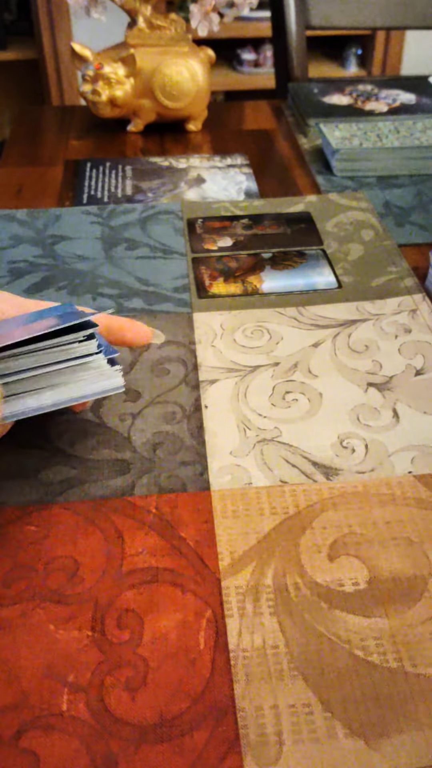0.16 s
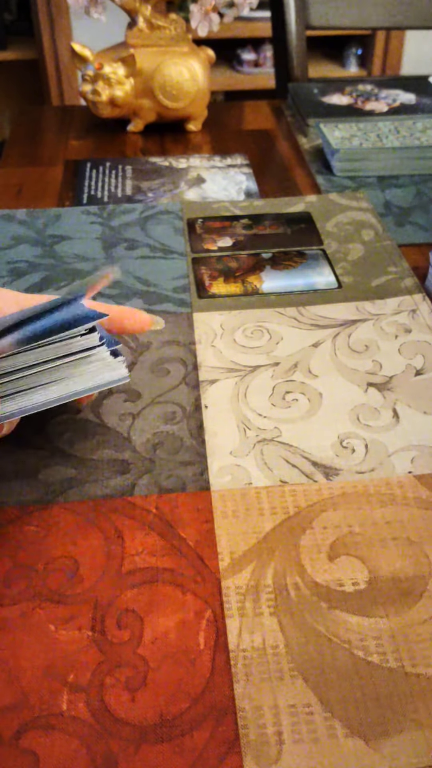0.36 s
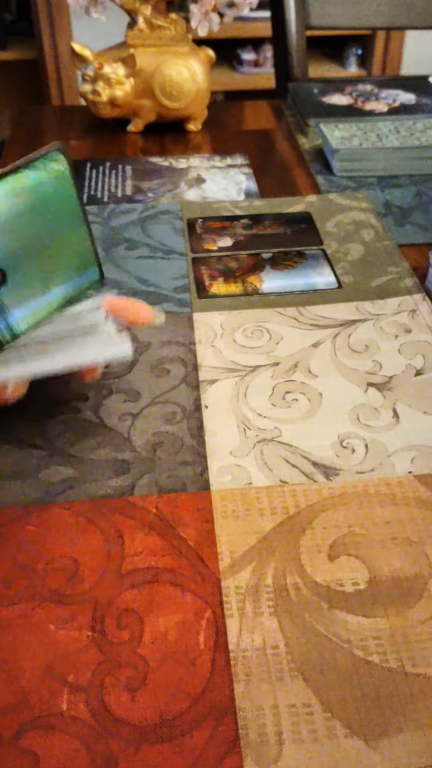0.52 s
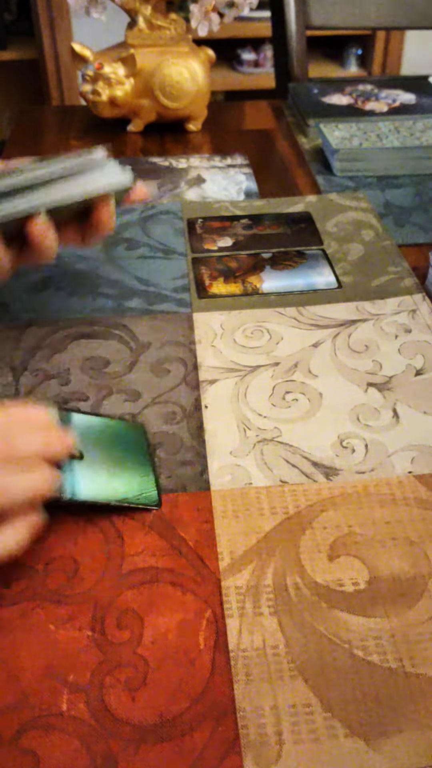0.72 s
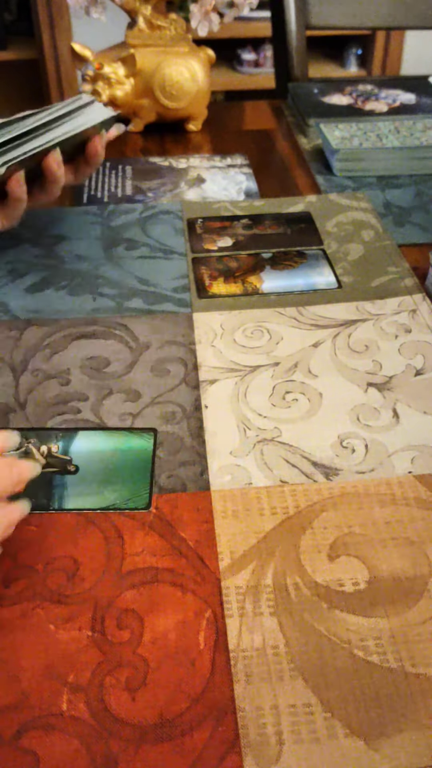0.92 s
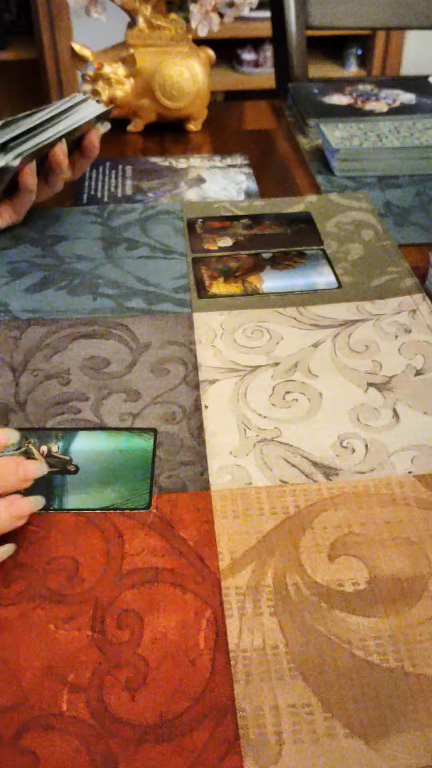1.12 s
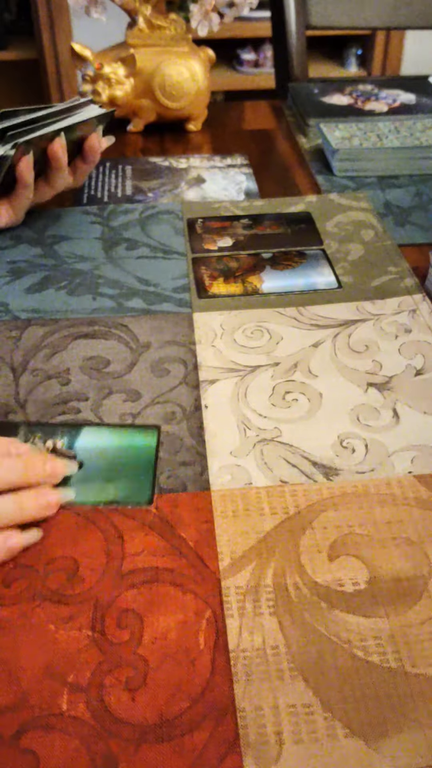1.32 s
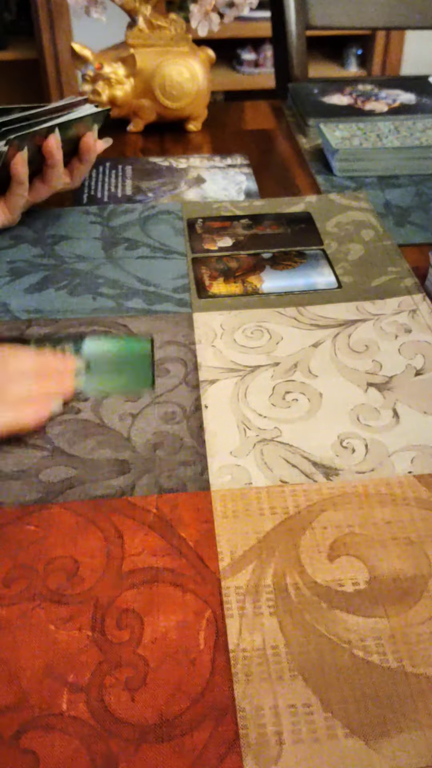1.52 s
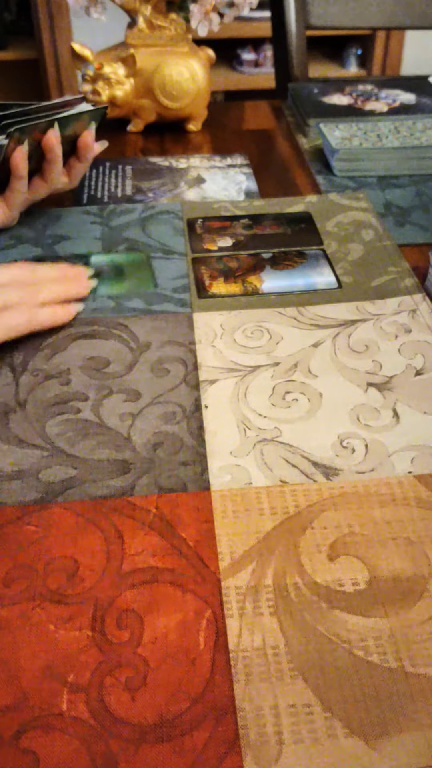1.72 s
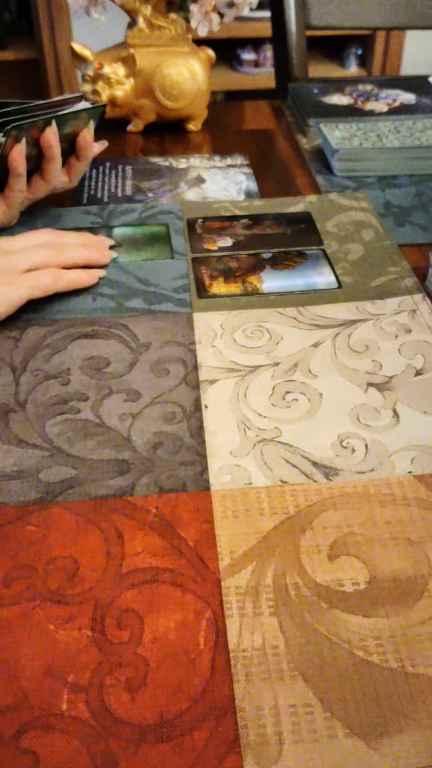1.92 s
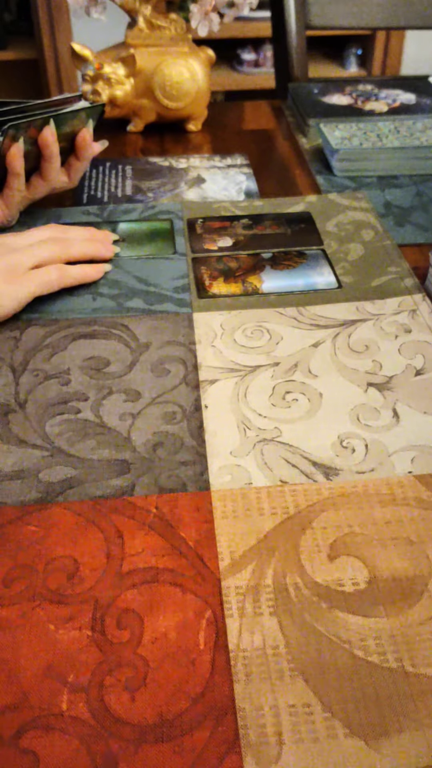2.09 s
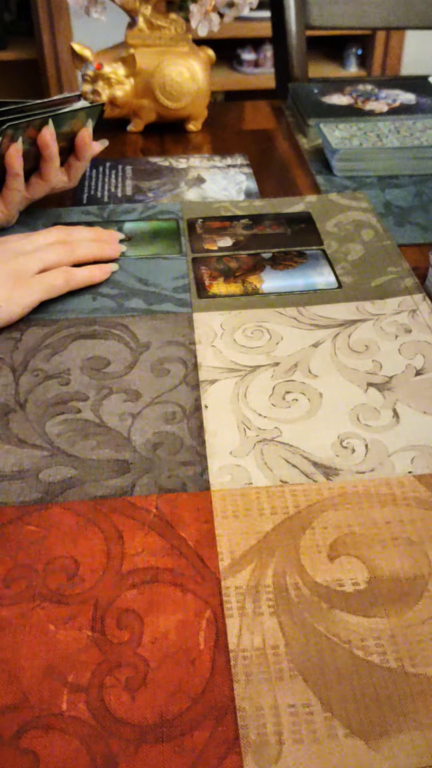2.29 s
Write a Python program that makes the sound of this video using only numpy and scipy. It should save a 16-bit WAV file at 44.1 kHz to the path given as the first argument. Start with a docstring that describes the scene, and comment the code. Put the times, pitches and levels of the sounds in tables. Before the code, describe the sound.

A single card is dealt: faint thumb rubbing and tiny edge slips, a sharp flick off the deck, a crisp snap on a cloth-covered table, two fingernail ticks, then a soft fading slide; close phone microphone, quiet small room.

```python
"""Soft rubbing of thumb and card over faint hiss and slow air sway, then knocks as a stiff card flicks
off a hand-held deck, snaps down on a cloth-covered table, is caught by fingernails and slides on the cloth.
Blows are rung modes plus papery puffs; rub, slide and floor are shaped, patchy noise; sway is slow noise.
A quiet small room adds a sparse decaying tail to the cards; a phone close by limits the band."""
import sys
import numpy as np
from scipy import signal
from scipy.fft import rfft, irfft
from scipy.io import wavfile
from scipy.ndimage import uniform_filter1d

SR = 44100
rng = np.random.default_rng(int(sys.argv[2]) if len(sys.argv) > 2 else 0)


def wrap_up_sound(samples):
    """Save the sound to the file named by the first command line argument, as 16-bit audio."""
    columns = np.atleast_2d(samples).T
    # keep every value between -1 and 1, then stretch to whole-number steps
    tamed = np.clip(columns, -1, 1)
    steps = np.round(tamed * 32767).astype(np.int16)
    wavfile.write(sys.argv[1], SR, steps)


def invert_db(level):
    """Linear amplitude ratio for a level in decibels (20 dB per decade), elementwise."""
    return 10 ** (np.asarray(level, dtype=float) / 20)


N = 103635


def evened(x):
    """Scales to rms 1."""
    return x / np.sqrt(np.mean(x ** 2) + 1e-20)


def read(points, hz):
    """Interpolates a table on a log-frequency axis."""
    f, value = np.transpose(points)
    return np.interp(np.log(hz + 1), np.log(f + 1), value)


def add(mix, start_s, sound):
    """Mixes a sound in at start_s, cut at the end of the mix."""
    part = mix[round(start_s * SR):][:len(sound)]
    part += sound[:len(part)]


def ring(modes, peak_db, contact_s, tilt_db_oct=0, scale=1):
    """A sharp push and a short rough contact excite decaying modes; every blow detunes them anew."""
    detune = 0.031  # standard deviation, fraction of f
    t = np.arange(4096) / SR
    body = np.zeros(len(t))
    for f, level_db, t60_s in modes:
        mode_hz = f * scale * (1 + detune * rng.standard_normal())
        envelope = invert_db(level_db + tilt_db_oct * np.log2(f / 3000) - 60 * t / t60_s)
        body += envelope * np.sin(2 * np.pi * mode_hz * t)
    push = 0.37 * rng.standard_normal(512) * np.exp(-t[:512] / max(contact_s, 1e-4))
    push[0] = -1
    out = signal.fftconvolve(body, push)[:len(t)]
    return invert_db(peak_db) * out / abs(out).max()


def paper(db):
    """A papery puff: broad band-passed noise starting 16 dB below db, dying exponentially."""
    t60_s = 0.016
    t = np.arange(4096) / SR
    band = signal.butter(1, [500 / SR * 2, 6000 / SR * 2], "band")
    puff = evened(signal.lfilter(*band, rng.standard_normal(len(t))))
    return invert_db(db - 16 - 60 * t / t60_s) * puff


def thinned(x, hz):
    """High-pass: takes out the bass that a small object cannot radiate."""
    return signal.lfilter(*signal.butter(2, hz / SR * 2, "high"), x)


def hiss(tone_db, size, patchy_db, curve=None, grit_db=0, grit_per_s=3000):
    """Coloured, patchy noise with random stronger grains, rms 1 or on a curve of level and brightness."""
    grain = rng.random(N) < grit_per_s / SR
    grain_gain = invert_db(grit_db * np.minimum(rng.exponential(1, N), 4))
    x = rng.standard_normal(N) * (1 + grain * grain_gain)
    overlap = size * 3 // 4
    hz, t, z = signal.stft(x, SR, nperseg=size, noverlap=overlap)
    patches = uniform_filter1d(rng.standard_normal(z.T.shape), size=8, axis=0)
    patches = evened(uniform_filter1d(patches, size=6, axis=1)).T
    shape = invert_db(tone_db(hz))[:, None] * np.ones(len(t))
    if curve is not None:
        s, db, tilt_db_oct = np.transpose(curve)
        shape = shape * invert_db(np.outer(np.log2((hz + 100) / 3000), np.interp(t, s, tilt_db_oct)))
    shape /= np.sqrt((shape ** 2).mean(0))
    shaped = z * shape * invert_db(patchy_db * patches)
    out = evened(signal.istft(shaped, SR, nperseg=size, noverlap=overlap)[1][:N])
    if curve is None:
        return out
    return out * invert_db(np.interp(np.arange(N) / SR, s, db, -120, -120))


# Thumb and card on deck, card on cloth, hand settling: [t/s, level/dB, brightness/(dB/oct)]
RUB_CURVE = [(0, -62.5, -2), (.07, -62, -1), (.12, -75, -8), (.165, -61, 1), (.2, -66.5, -6.5),
             (.225, -58.5, 2.5), (.29, -69.5, -4), (.305, -59.5, -1.5), (.37, -59.5, -1), (.42, -58, 0),
             (.46, -51.5, -1), (.55, -58.5, -3), (.59, -63, 0), (.65, -55, -3), (.72, -63, 3),
             (.755, -52.5, 3), (.763, -44, 8.5), (.773, -44, 6.5), (.785, -45, 1), (.83, -50, 0),
             (.95, -65, -5), (1.15, -67.5, -8.5), (1.36, -78, -1.5)]
# Rub spectrum: [f/Hz, relative level/dB]
RUB_TONE = [(88, -45), (150, -22), (261, -14), (669, -16), (860, -11.5), (1830, -8.5), (3710, -16),
            (5640, -19), (7500, -12), (8300, -31.5), (10800, -58.5), (18300, -120)]


def rub():
    """Skin and card friction: grainy noise of uneven level and brightness."""
    return hiss(lambda hz: read(RUB_TONE, hz), size=256, patchy_db=2.1, curve=RUB_CURVE,
                grit_db=4.5, grit_per_s=1500)


# Background hiss spectrum: [f/Hz, relative level/dB]
FLOOR_TONE = [(24, -51), (40, 9), (160, -8), (195, -9), (267, -6), (477, -15), (533, -18.5), (911, -17),
              (1330, -31), (7590, -22.5), (8300, -39.5), (10800, -72.5), (18300, -120)]


def floor():
    """Quiet steady background: coloured noise at a fixed rms."""
    return invert_db(-62.5) * hiss(lambda hz: read(FLOOR_TONE, hz), size=2048, patchy_db=-0.5)


# Air moved at the microphone: [t/s, level/dB], smoothed in use
SWAY_CURVE = [(0.0, -42), (0.04, -47), (0.39, -34), (0.42, -38), (0.61, -40.5), (0.76, -28.5), (0.84, -45),
              (0.91, -32), (1.09, -35), (1.16, -44), (1.49, -39), (1.54, -42.5), (1.77, -33.5), (1.9, -46),
              (2.1, -39.5), (2.35, -49)]
# Sway spectrum: [f/Hz, relative level/dB]
SWAY_TONE = [(.3, -36), (1, -5.5), (3, 5.5), (8, -0.5), (16, -13), (30, -37.5), (60, -37), (150, -55),
             (400, -85)]


def sway():
    """Very slow pressure swings from the moving hands: noise shaped to a few Hz."""
    hz = np.fft.rfftfreq(N, 1 / SR)
    slow = evened(irfft(rfft(rng.standard_normal(N)) * invert_db(read(SWAY_TONE, hz)), N))
    s, db = np.transpose(SWAY_CURVE)
    level_db = uniform_filter1d(np.interp(np.arange(N) / SR, s, db), size=2000)
    return slow * invert_db(level_db)


# Room decay: [f/Hz, t60/s]
ROOM_T60 = [(100, 0.36), (400, .3), (1500, 0.22), (4000, 0.33), (8000, .22)]


def room(x):
    """Small-room tail: sparse taps of random sign, each band dying at its own speed."""
    taps = np.zeros(SR // 2)
    at = np.arange(200, SR // 2 - 20, 20)
    taps[at + rng.integers(0, 20, len(at))] = rng.choice([-1., 1.], len(at))
    hz, t, z = signal.stft(taps, SR, nperseg=256)
    decay = invert_db(-60 * t / read(ROOM_T60, hz)[:, None])
    tail = signal.istft(z * decay, SR, nperseg=256)[1]
    return invert_db(-13) * signal.fftconvolve(x, tail / np.linalg.norm(tail))[:N]


# Deck knocked or card flicking off; levels before trim and high-pass:
# [t/s, knock level/dB, crack level/dB, contact/s, knock brightness/(dB/oct)]
KNOCKS = [(0.054, -44, -52.5, 0.00042, 5), (0.1815, -40.5, -56, .001, 15),
          (.4688, -26.5, -35.5, 0.0024, -4), (.4758, -18.5, -25.5, 0.00061, -1),
          (.4782, -26, -36.5, 0.0012, -1), (0.499, -32.5, -18.5, 0.0002, -5),
          (0.5018, -19.5, -23, 0.001, 5.5), (.5022, -11, -25, 0.0011, 0),
          (0.5202, -39.5, -41.5, 0.0011, -4), (0.5999, -45, -44.5, 0.00042, 3),
          (0.6067, -49.5, -41, 0.00099, 6), (.644, -45, -53, 0.0011, 5)]
# Deck modes: [f/Hz, relative level/dB, t60/s]
DECK_MODES = [(241, -9.5, 0.031), (327, -9, 0.076), (408, 3.5, 0.027), (733, 8.5, 0.029), (1010, 4, 0.012),
              (1272, 4, 0.024), (1850, -6.5, .01), (2500, -9.5, 0.0055)]
# Card-edge modes: [f/Hz, relative level/dB, t60/s]
CRACK_MODES = [(3260, -6.5, 0.006), (5800, 9, 0.0061), (6330, 5, 0.0086), (6990, -5, 0.0098)]


def knocks():
    """Each blow rings the deck body and the card edge, with a papery puff."""
    out = np.zeros(N)
    for s, knock_db, crack_db, contact_s, tilt_db_oct in KNOCKS:
        crack_peak_db = crack_db + 3.5
        knock = thinned(ring(DECK_MODES, knock_db, contact_s, tilt_db_oct), 120)
        crack = ring(CRACK_MODES, crack_peak_db, contact_s)
        add(out, s, knock + crack + paper(crack_peak_db))
    return out


# Card edge slipping over its neighbours; level before high-pass:
# [t/s, level/dB, contact/s, brightness/(dB/oct)]
SLIPS = [(0.3009, -40, 0.00077, -10.5), (.3237, -39.5, 0.0003, 5), (0.3304, -52, 0.0012, -10),
         (0.3489, -35.5, 0.00071, -6.5), (0.3582, -46, 0.00217, -1), (0.399, -34.5, 0.00094, 0.5),
         (0.416, -42.5, 0.0026, 5)]
# Slipping-edge modes: [f/Hz, relative level/dB, t60/s]
EDGE_MODES = [(710, -10, 0.011), (1810, 5, 0.021), (3030, 3.5, .005), (3570, -0.5, 0.0031),
              (4600, -6, 0.0048), (7050, -9, 0.0035)]


def slips():
    """Each slip rings the thin card edge, which radiates little bass, with a papery puff."""
    out = np.zeros(N)
    for s, db, contact_s, tilt_db_oct in SLIPS:
        edge = thinned(ring(EDGE_MODES, db, contact_s, tilt_db_oct), 500)
        add(out, s, edge + paper(db + 4))
    return out


# Card landing edge after edge:
# [t/s, card level/dB, thud level/dB, card brightness/(dB/oct), contact/s]
SNAPS = [(.7858, -35, -29.5, -10.5, .001), (.7888, -19, -39, 3, 0.00091), (.7948, -13, -35.5, -2, 0.00055),
         (.7962, -26, -23.5, -10, 0.00065), (.8013, -18, -27, 4.5, 0.0014), (.8077, -23, -41, 4, 0.0014)]
# Card modes: [f/Hz, relative level/dB, t60/s]
CARD_MODES = [(850, 3.5, 0.002), (1544, 3, 0.019), (1995, 7.5, 0.011), (3030, 1.5, 0.0054),
              (3500, 5.5, 0.0079), (4300, 4, 0.0044), (5400, -11.5, .004), (6670, -5.5, .004),
              (8070, -30, 0.0021)]
# Table modes: [f/Hz, relative level/dB, t60/s]
TABLE_MODES = [(70, -11, 0.07), (115, -5, 0.052), (212, 6.5, 0.014), (306, 1.5, 0.022), (476, -1.5, 0.043)]


def snaps():
    """Each landing rings the card and thuds the table, with a papery puff."""
    out = np.zeros(N)
    for s, card_db, thud_db, tilt_db_oct, contact_s in SNAPS:
        card = ring(CARD_MODES, card_db, contact_s, tilt_db_oct)
        thud = ring(TABLE_MODES, thud_db, contact_s)
        add(out, s, card + thud + paper(card_db + 6))
    return out


# Fingernails on the lying card; level before high-pass: [t/s, level/dB, pitch f/Hz]
NAILS = [(1.3684, -48, 2800), (1.3708, -19.5, 3180), (1.4057, -16, 3500), (1.4062, -35, 3240),
         (2.048, -51, 3830), (2.071, -62, 2000), (2.1, -48, 2580)]
# Nail-tick modes: [multiple of pitch, relative level/dB, t60/s]
NAIL_MODES = [(.62, -6, 0.0037), (.8, -14.5, .003), (1, 7, 0.0064), (1.4, -1.5, 0.0065),
              (2.15, 0.5, 0.0053)]


def nails():
    """Each tick is a very short contact ringing modes scaled to its pitch, with a papery puff."""
    out = np.zeros(N)
    for s, db, pitch_hz in NAILS:
        tick = thinned(ring(NAIL_MODES, db, contact_s=0.00014, scale=pitch_hz), 1700)
        add(out, s, tick + paper(db - 8))
    return out


# Card sliding over the cloth: [t/s, level/dB, brightness/(dB/oct)]
SLIDE_CURVE = [(1.373, -56, 11), (1.381, -42, 0), (1.4, -55, 1), (1.415, -45.5, 2.5), (1.47, -47.5, 2),
               (1.5, -42, 3), (1.57, -40, 1.5), (1.64, -40.5, -0.5), (1.7, -42.5, 2), (1.77, -43.5, 2),
               (1.8, -47, 1.5), (1.9, -49.5, 1), (1.97, -53.5, 1.5), (2.05, -57, 0.5), (2.13, -64.5, -2),
               (2.2, -61, -1.5), (2.26, -64.5, -2), (2.35, -82, 6)]
# Slide spectrum: [f/Hz, relative level/dB]
SLIDE_TONE = [(120, -44), (200, -21.5), (776, -8), (1060, -12), (1890, -5), (3410, -1), (5360, -7),
              (7440, -8.5), (8300, -21), (10800, -53), (18300, -120)]
# Broad resonances added to it: [f/Hz, width/Hz, height/dB]
SLIDE_PEAKS = [(790, 63, 2.5), (1886, 300, 4), (3500, 2000, 1), (4700, 200, 2.5), (7400, 430, 1.5)]


def slide():
    """Fine grit of the weave under the card, coloured by broad resonances."""
    def tone_db(hz):
        """Base spectrum plus resonance bumps, in dB."""
        peaks = sum(db / (1 + (2 * (hz - f) / width) ** 2) for f, width, db in SLIDE_PEAKS)
        return read(SLIDE_TONE, hz) + peaks
    return hiss(tone_db, size=256, patchy_db=2.0, curve=SLIDE_CURVE, grit_db=3.5, grit_per_s=1600)


def scene():
    """Cards with their room tail, over background hiss and air sway."""
    cards = rub() + knocks() + slips() + snaps() + nails() + slide()
    return (cards + room(cards) + floor() + sway())[None]


def top_cut(x):
    """Nothing passes above the cut-off."""
    return signal.sosfilt(signal.butter(12, 8740, fs=SR, output="sos"), x)


def record(dry):
    """The phone's band limit: a linear-phase low-pass."""
    edge_hz = 8080
    band = signal.firwin(161, edge_hz, window=("kaiser", 9), fs=SR)
    mix = signal.oaconvolve(dry, band[None], "same")
    return top_cut(mix)


dry = scene()
out = record(dry)
wrap_up_sound(out)
```